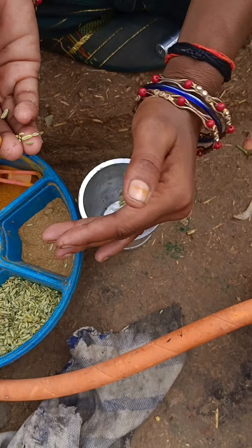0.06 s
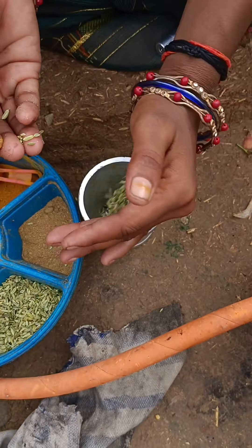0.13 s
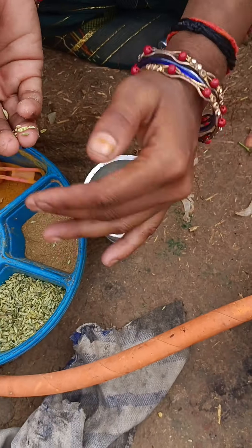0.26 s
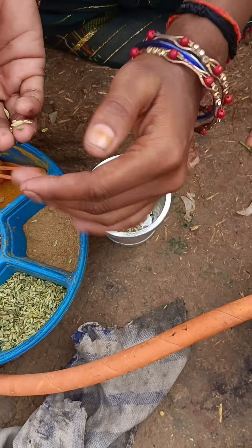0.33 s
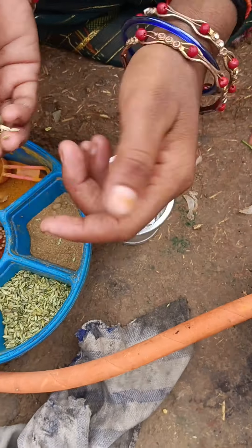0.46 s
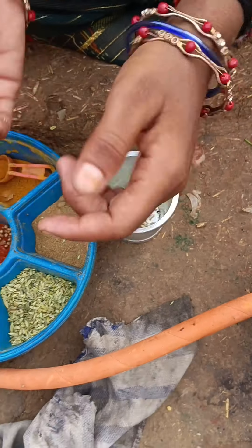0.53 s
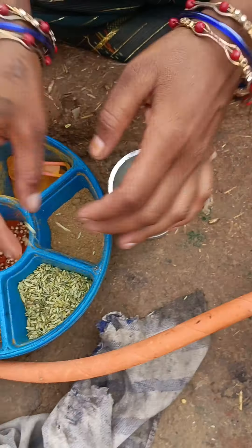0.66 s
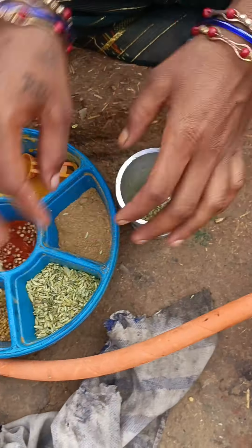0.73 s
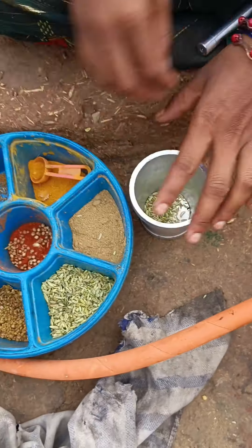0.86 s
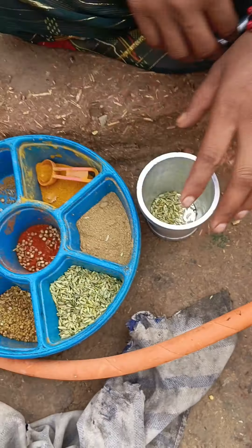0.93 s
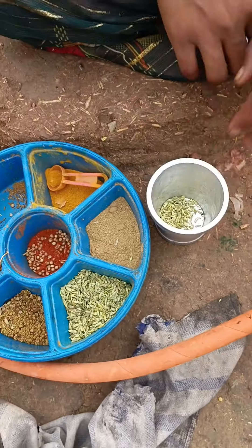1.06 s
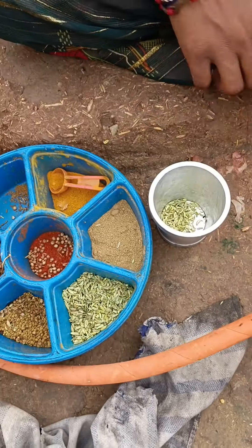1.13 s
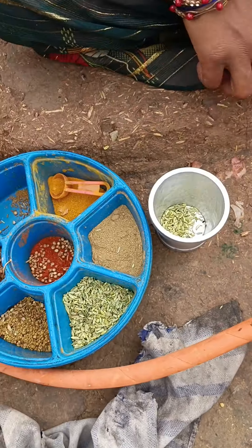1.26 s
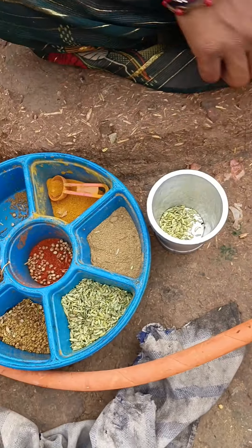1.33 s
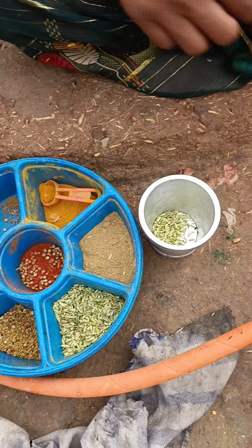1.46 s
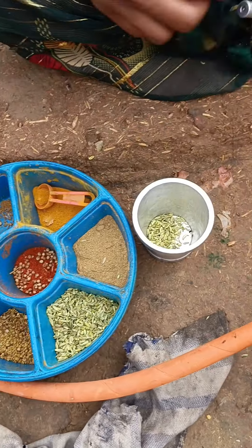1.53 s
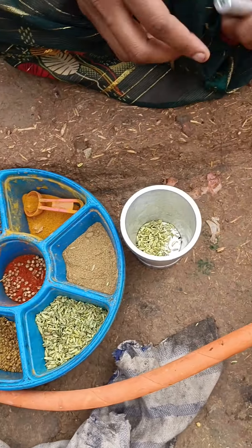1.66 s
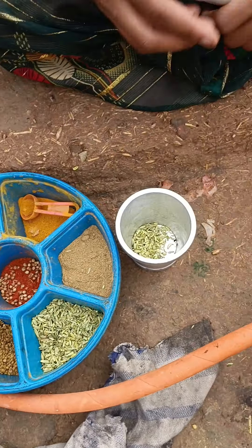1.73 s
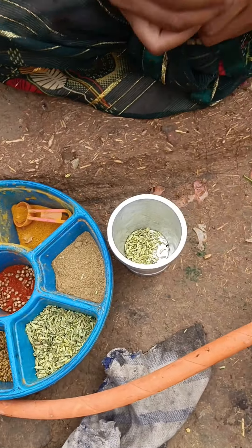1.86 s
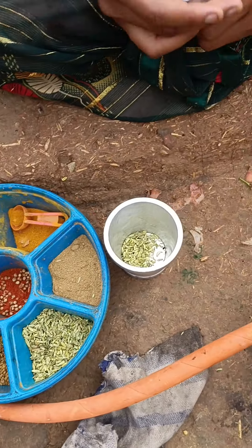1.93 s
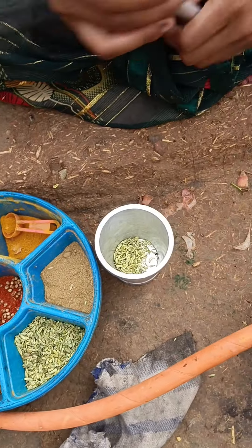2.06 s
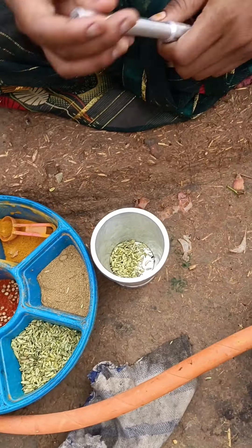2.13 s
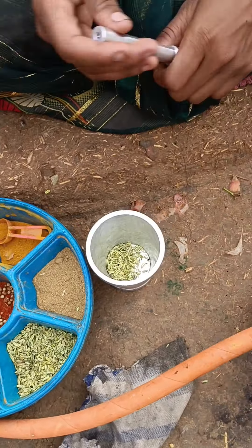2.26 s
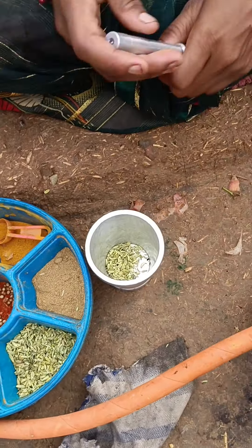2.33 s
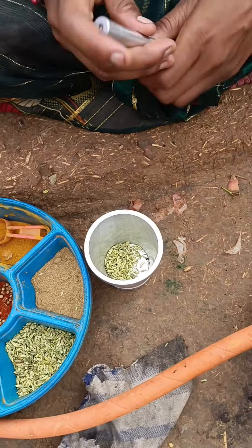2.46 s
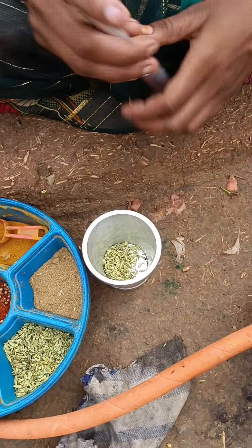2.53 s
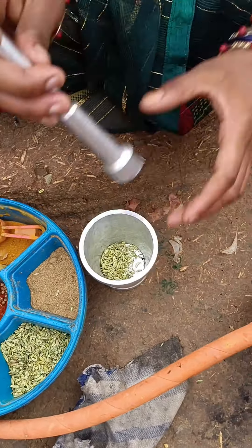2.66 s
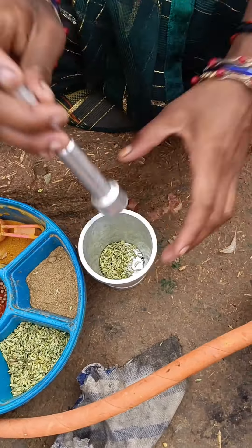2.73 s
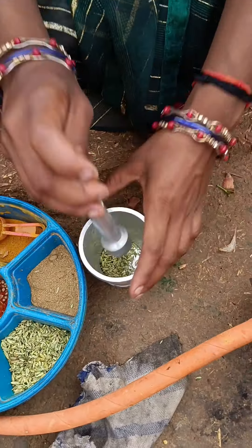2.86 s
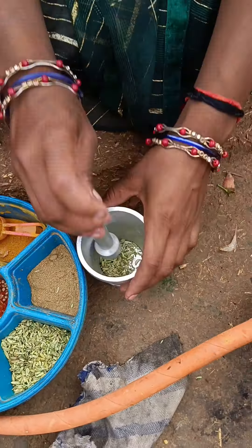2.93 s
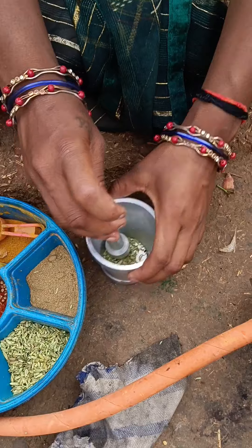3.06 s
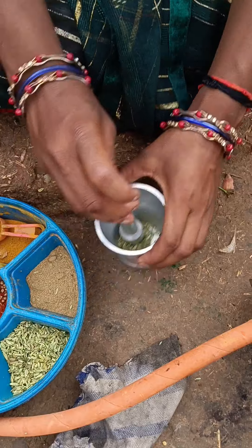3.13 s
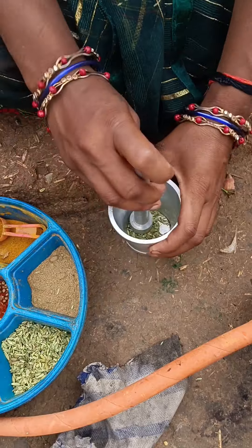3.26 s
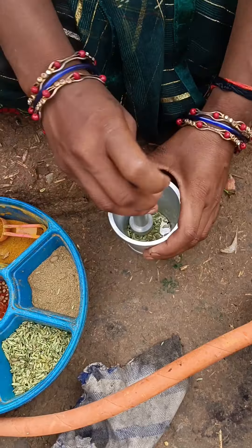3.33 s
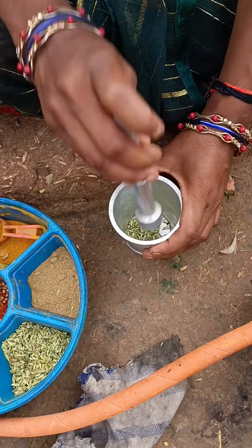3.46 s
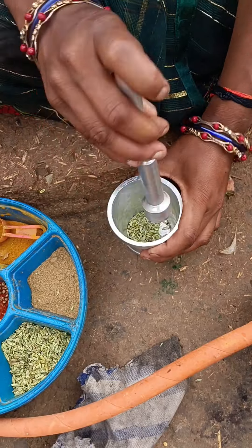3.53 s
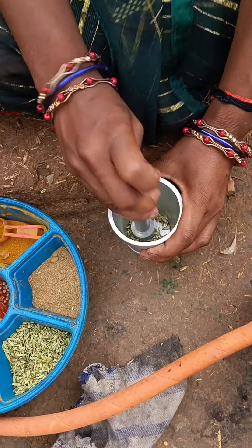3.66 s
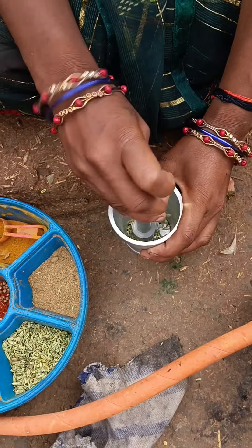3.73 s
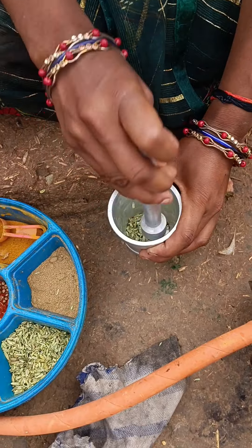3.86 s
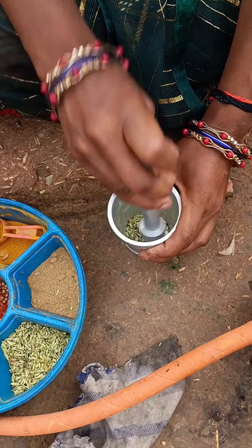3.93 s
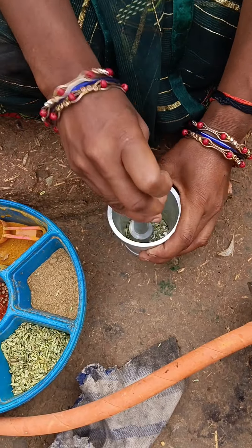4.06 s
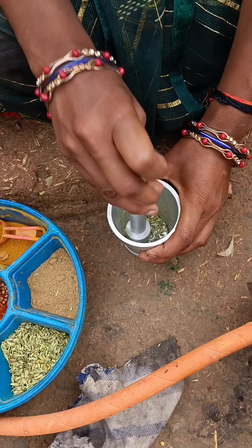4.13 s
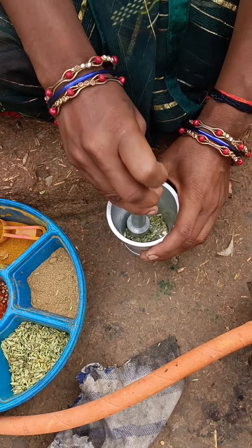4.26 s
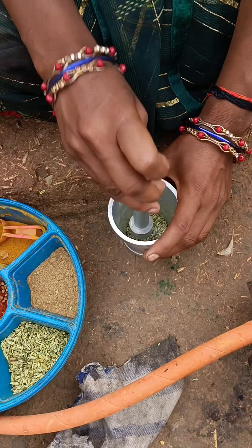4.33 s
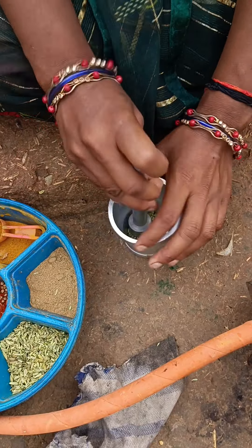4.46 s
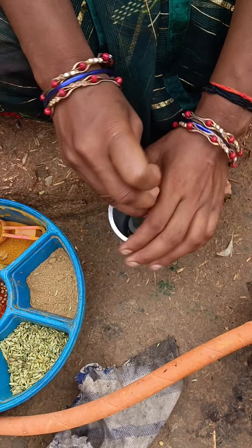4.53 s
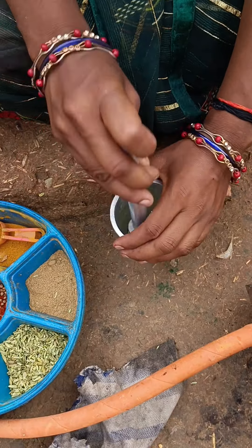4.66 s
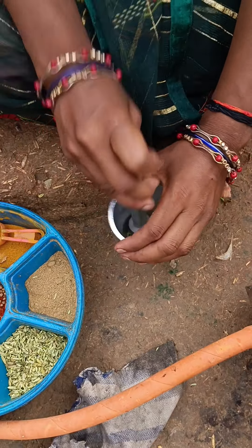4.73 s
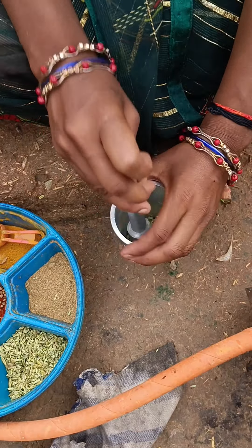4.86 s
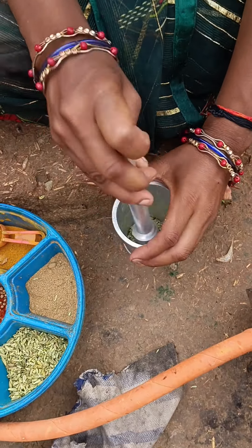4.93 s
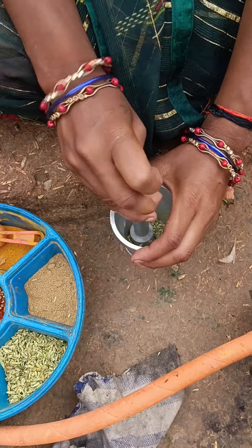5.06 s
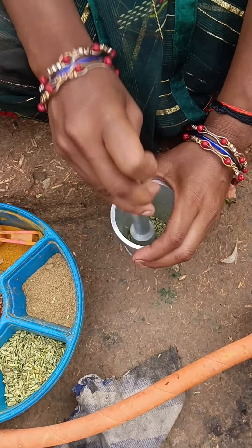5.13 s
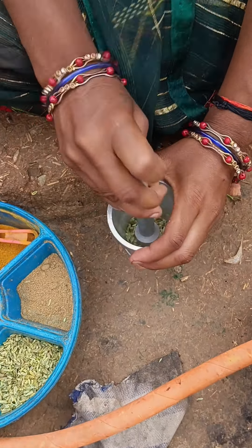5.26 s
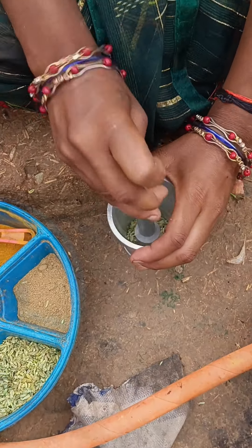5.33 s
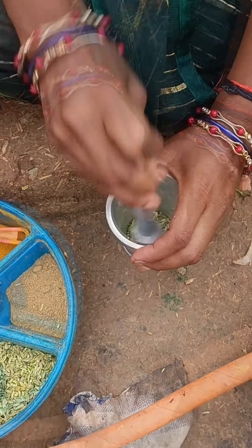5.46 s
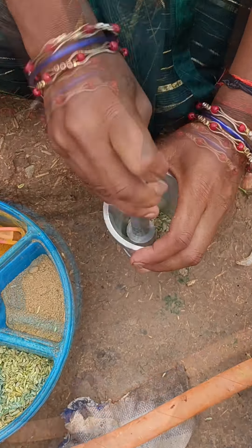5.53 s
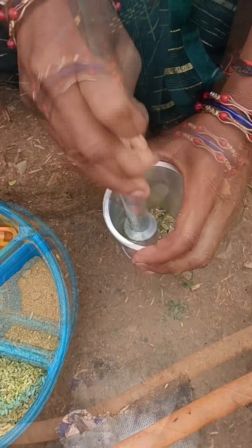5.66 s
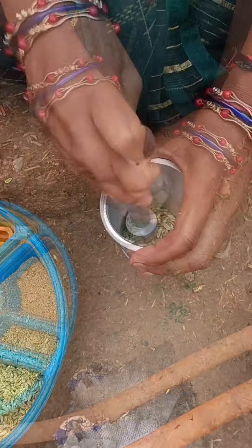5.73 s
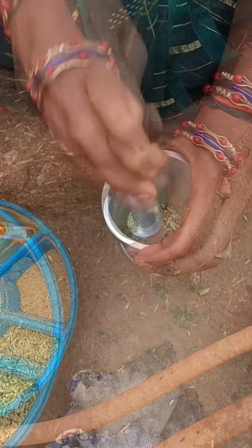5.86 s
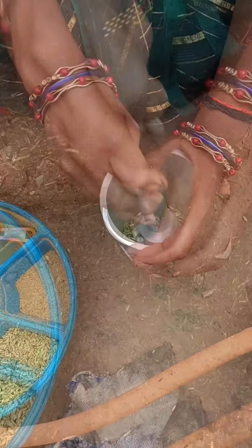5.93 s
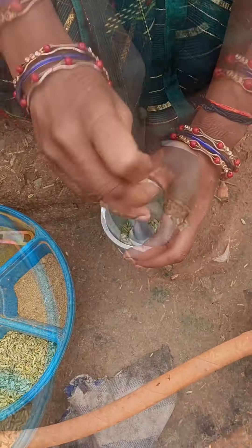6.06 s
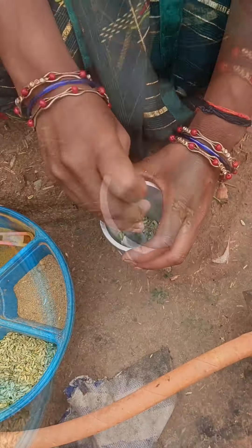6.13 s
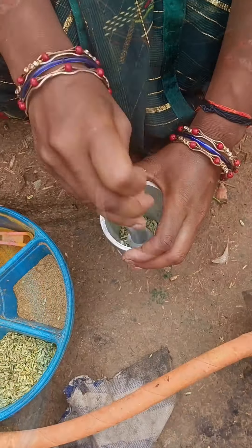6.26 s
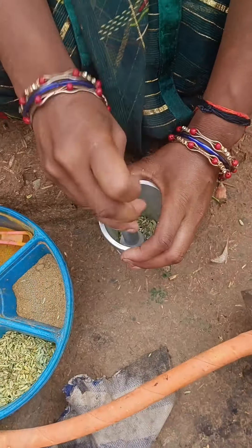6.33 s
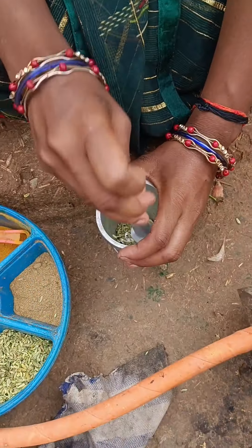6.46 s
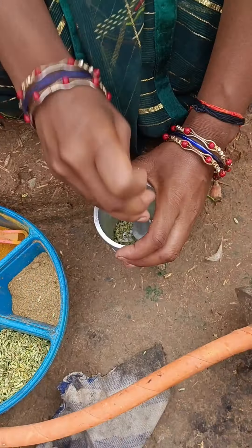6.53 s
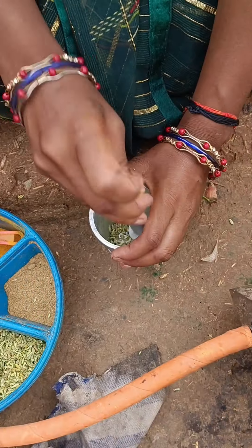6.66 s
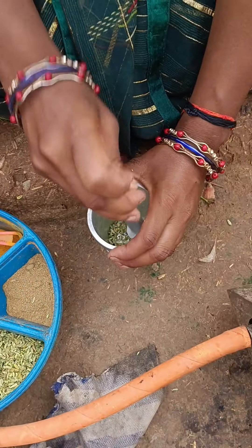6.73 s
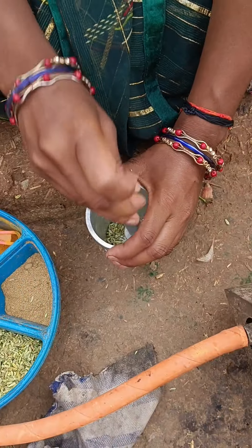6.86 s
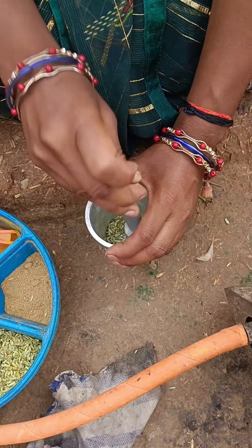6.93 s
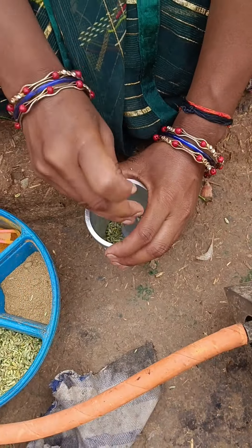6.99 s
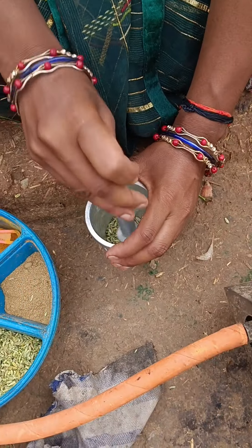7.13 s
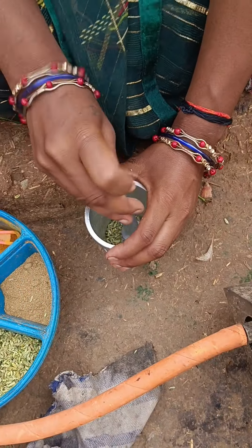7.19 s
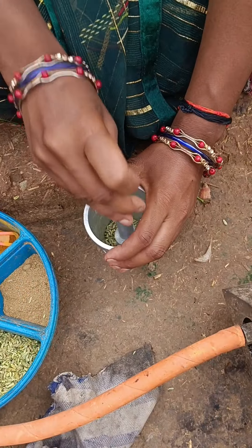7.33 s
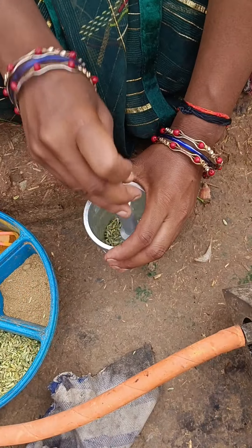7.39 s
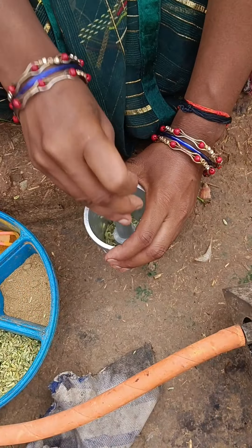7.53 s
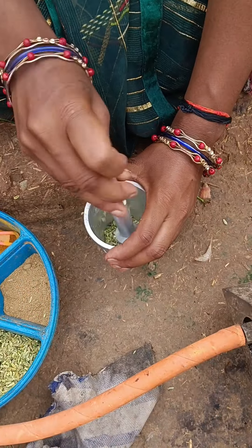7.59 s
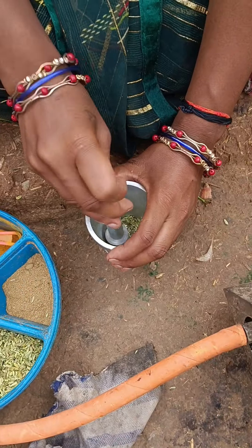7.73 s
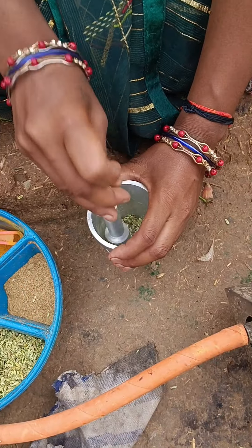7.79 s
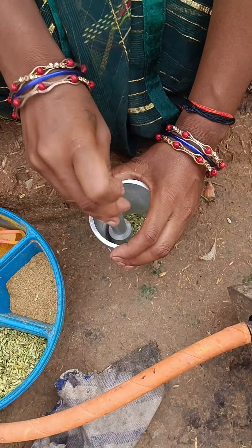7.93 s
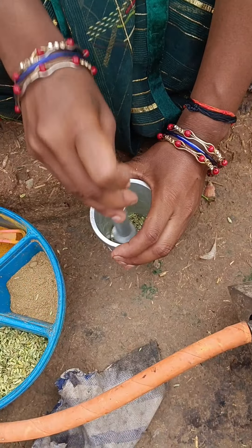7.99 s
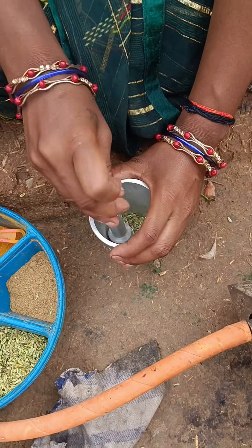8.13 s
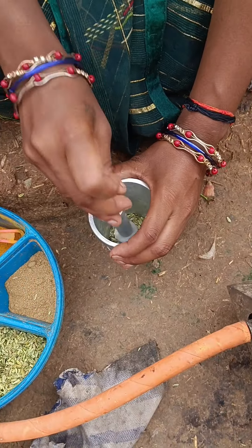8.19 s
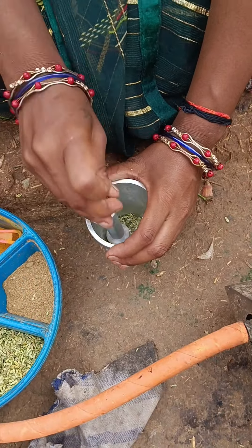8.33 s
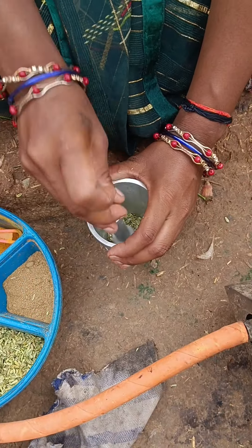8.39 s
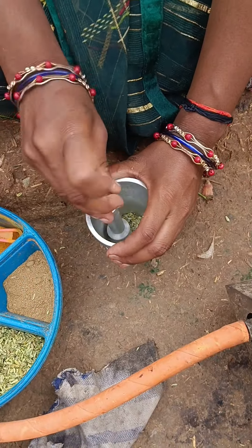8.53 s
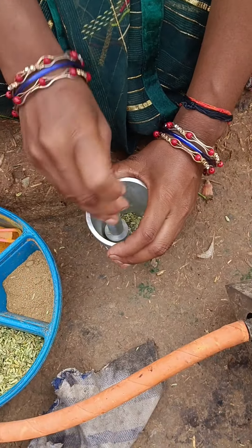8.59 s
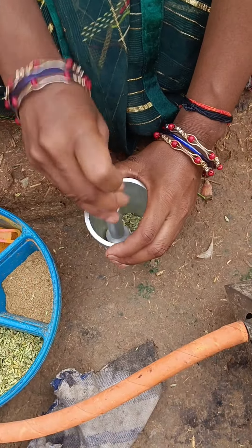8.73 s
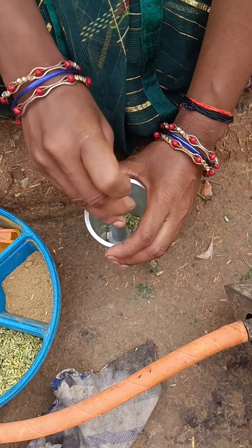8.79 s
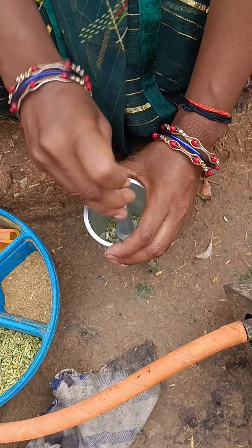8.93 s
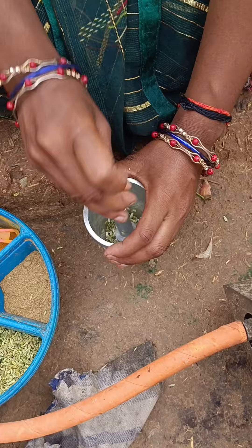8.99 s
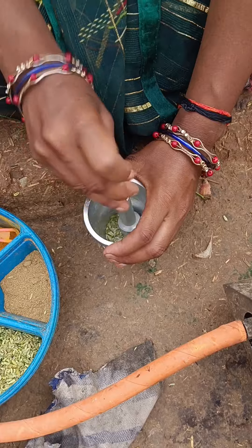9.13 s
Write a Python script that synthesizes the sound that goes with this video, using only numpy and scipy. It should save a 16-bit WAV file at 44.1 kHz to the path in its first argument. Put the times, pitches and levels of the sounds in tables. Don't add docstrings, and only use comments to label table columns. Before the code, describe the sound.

Quiet yard hiss, dry ticks and a faint cricket, then close metallic knocking, seed-crushing thuds and gritty wall scrapes as bangles chatter on the wrists.

```python
import sys
import numpy as np
from scipy import signal
from scipy.fft import rfft, irfft, next_fast_len
from scipy.io import wavfile
from scipy.ndimage import uniform_filter1d, map_coordinates

SR = 44100
rng = np.random.default_rng(int(sys.argv[2]) if len(sys.argv) > 2 else 0)


def materialize(psi):
    bounded = np.clip(np.atleast_2d(psi).T, -1, 1)
    quanta = np.round(bounded * 32767).astype(np.int16)
    wavfile.write(sys.argv[1], SR, quanta)


def to_linear_factor(level_db):
    exponent = np.asarray(level_db, float) / 20
    return 10 ** exponent


N = 404375

# time [s], yard hiss [dB], wind on the ports [dB], shifting seeds and cloth [dB].
BEDS = [(0.0, -59.5, -59, -57.5), (1.05, -59, -65, -56.5), (1.25, -60, -46, -61), (1.5, -60, -61, -56),
        (2.83, -56.5, -77, -75), (3.57, -60, -84, -72), (4.01, -57, -65.5, -59), (5.31, -61.5, -85, -55),
        (6.788, -56.5, -81, -73), (8.3, -57.5, -82, -81), (9.17, -58.5, -48, -71)]
# frequency [Hz], density [dB per Hz].
YARD = [(24, -25), (40, 0), (81, 0), (177, 0), (386, -12.5), (725, -7), (823, -12), (1170, -10),
        (1990, -17), (2900, -11.5), (4130, -21), (6330, -16.5), (7010, -17), (14500, -34.5), (16500, -29)]
# frequency [Hz], correlation [0 to 1].
ALIKE = [(60, 0.88), (130, 1), (290, 0.71), (640, 1), (1410, 0.87), (3100, 1), (6820, 0.32), (15000, 0.26)]
# frequency [Hz], lead [radians].
YARD_LEAD = [(60, 0.08), (400, 0.24), (750, 2.5), (1200, 0.86), (2200, 2.0254), (16000, 1)]
# frequency [Hz], density [dB per Hz].
SEEDS = [(1500, -49), (3000, -10.5), (6000, -10.5), (9000, -8.5), (14000, -20.5), (15500, -5), (16500, -39)]
# start [s], peak [dB].
TICKS = [(0.026, -36), (0.161, -37.5), (0.752, -34.5), (0.964, -35), (1.145, -34.5), (1.2866, -38),
         (1.331, -41), (1.5523, -36), (2.004, -40), (2.149, -38), (2.37, -33.5), (2.4473, -32.5),
         (3.218, -33), (3.2384, -35), (3.789, -31.5), (3.9732, -31), (4.045, -44), (7.2613, -29.5),
         (7.5164, -34), (7.5996, -25.5), (8.3598, -38), (8.972, -30), (8.991, -31), (5.073, -35.5)]
# start [s], peak [dB].
FAR = [(0.058, -32), (0.33, -34), (0.58, -31), (0.848, -33), (1.042, -32.5), (1.127, -33), (1.22, -26.5),
       (1.398, -34.5), (1.486, -32), (1.732, -28.5), (1.965, -29.5), (2.245, -28.5), (2.49, -26.5),
       (2.753, -29), (3.004, -29), (3.285, -37), (3.379, -31), (3.551, -34), (3.781, -35)]
# time [s], chirps so far [count].
CHIRPS = [(.425, 4), (1.5, 14), (2.032, 19), (2.787, 26), (3.671, 34), (9.17, 84)]
# start [s], peak [dB], ring over scuff [dB].
JINGLES = [(0.7134, -32, -1), (.742, -33.5, 1), (.79, -42, 11), (.824, -26.5, -0.5), (.862, -33, -11),
           (.915, -42, 1), (1.048, -30, -5), (1.062, -28.5, -4), (1.0747, -31, -1), (1.095, -33, -15),
           (1.534, -32, -10), (1.567, -33, -3), (1.651, -34.5, 1), (1.681, -33, -3), (3.024, -32, -4),
           (3.121, -21.5, -2), (3.892, -22, -3), (3.951, -31, 4.5), (3.979, -24.5, -3.5), (4.275, -33, 1),
           (4.328, -34, -5), (4.562, -41.5, 9), (4.809, -31, -1.5), (4.913, -24, -10), (5.266, -37, 1),
           (5.698, -30.5, 4), (5.796, -40, 5), (5.885, -39, 1), (6.1, -44, 0), (6.248, -35, 2),
           (6.355, -50, -4), (6.455, -36, 7), (6.522, -45, -8), (6.65, -34, 4), (6.67, -29, 2),
           (6.735, -28, -6), (6.85, -30, -5), (6.881, -27, 4), (7.298, -31, 4), (7.509, -33.5, 7),
           (7.797, -34, 0), (7.85, -29.5, 2), (8.176, -31, -2), (8.195, -31, -8), (8.66, -34, -1),
           (8.688, -33, 0), (8.731, -34, -3), (8.845, -44, -2), (8.89, -42, -8), (9.065, -35, 0)]
# frequency [Hz], width [Hz], level [dB].
GLASS = [(6130, 90, -8), (8520, 80, -1), (11220, 70, 0), (11550, 90, -7), (13100, 90, -5), (14120, 90, 0)]
# frequency [Hz], level [dB], free t60 [s].
METAL = [
    [(3122, 0, 5), (3040, -16, .05)],
    [(2200, -2, .045), (3890, 0, .045), (4170, -3, .04), (2500, -9, .03), (1150, -12, .04),
     (1500, -14, .03), (4950, -12, .04), (6440, 0, .07), (6140, -8, .04)],
    [(8310, 0, .09), (8720, -18, .04)],
    [(10820, -4, .4), (12880, 0, .4)],
]
GRIP_DAMPS = [0.96, 0.99, 1, 2.2]
# start [s], peak [dB], t60 [s], cup modes [dB].
LOOSE_KNOCKS = [(3.1312, -8.5, 3.4, -9.5), (4.11, -12.5, 0.019, -41), (4.343, -10.5, 0.059, -8),
                (4.4063, -6, 0.1, -10.5), (4.654, -12, 3.9, -1.5), (4.7691, -26, 0.019, 1.5),
                (4.9325, -15, 0.077, -0.3), (5.116, -13.5, 0.032, -10), (5.3241, -22.5, 0.025, -13.5),
                (5.376, -6, 0.014, -16.5), (5.5439, -25, 0.068, -7), (5.6294, -11, 0.021, -14.5),
                (5.916, -23, 0.055, -2)]
# start [s], peak [dB], t60 [s], cup modes [dB].
TIGHT_KNOCKS = [(6.1972, -13, 0.028, -13.5), (6.48, -41, 0.028, -12), (6.507, -22.5, 0.029, -1),
                (6.5898, -18.5, 0.12, -2.5), (6.691, -7.5, 0.032, -19.5), (6.942, -16.5, 0.016, -3),
                (7.0432, -13.5, 0.052, -4.5), (7.3336, -3, 0.02, -15.5), (7.7863, -3, 0.019, -17.5),
                (7.8238, -5, 0.022, -8.5), (7.999, -14, 0.03, -10), (8.0501, -6.5, 0.02, -11),
                (8.2263, -0.5, 0.013, -20), (8.2406, -30, 0.35, -9), (8.2745, -11, 0.029, -1.5),
                (8.4324, -2, 0.021, -12.5), (8.6017, -5, 0.021, -9.5), (8.8195, -25, 0.012, -9),
                (8.842, -21, 0.03, -12), (8.9151, -6, 0.01, -7)]
# start [s], peak [dB].
RATTLE = [
    (3.1374, -26),
    (3.1434, -23),
    (3.1504, -18),
    (3.1582, -17.5),
    (3.1674, -20),
    (3.1724, -20.5),
    (3.1794, -40),
]
# frequency [Hz], width [Hz], level [dB].
CUP = [(1090, 220, -4), (2220, 90, 2.5), (4190, 120, -0.5), (6360, 76, 0)]
# start [s], peak [dB], hollow note [dB], crunch [dB].
THUDS = [(3.832, -15, -4, 2.5), (4.152, -15.5, -13.5, 3.5), (4.405, -25.5, -6, 19.5),
         (4.654, -20.5, -25, 6), (4.931, -23, -5.5, 19), (5.183, -21.5, -2.5, -2), (5.435, -22.5, -34, 4),
         (5.618, -33, -8, -14), (5.673, -26.5, -9, 2), (5.845, -27.5, -19, 6), (6.064, -19, 1, -4),
         (6.289, -24.5, -9.5, 9), (6.508, -22.5, -9.5, -1), (6.721, -26.5, -28, 7), (6.94, -16, -0.5, 2.5),
         (7.144, -15, -3, -3), (7.37, -16, -0.5, -7), (7.602, -18.5, 3.5, -14), (7.824, -23, -3, 11),
         (8.055, -30, 3, 19.5), (8.271, -22.5, -10, 17), (8.491, -20, -6, -7), (8.707, -14.5, 7.5, -10),
         (8.915, -20.5, 1.5, 4), (9.11, -21, -5.5, 5)]
# frequency [Hz], width [Hz], level [dB].
GROUND_MODES = [(98, 26, -6.5), (207, 50.4, -4), (400, 226, -10), (516, 189, -7), (744, 195, -10),
                (950, 196, -12.5), (1420, 320, -15)]
# start [s], peak [dB], length [s].
RUBS = [(4.0914, -28, 0.03), (5.353, -27, 0.066), (5.5817, -22, 0.021), (5.736, -38, 0.062),
        (5.769, -34.5, 0.024), (6.354, -44, 0.025), (6.426, -37, 0.011), (7.104, -31, .02),
        (5.813, -25.5, 0.029), (5.957, -32, 0.047), (5.998, -22, 0.022), (6.027, -23.5, 0.018),
        (6.2163, -25, 0.029), (6.257, -22, 0.02), (6.376, -25.5, 0.03), (6.414, -31.5, 0.054),
        (6.472, -19, 0.019), (6.578, -29, 0.02), (6.594, -19, 0.014), (6.606, -18.5, 0.018),
        (6.7937, -25.5, 0.039), (6.826, -20, 0.061), (6.861, -27, 0.028), (6.892, -19.5, 0.035),
        (7.036, -23.5, 0.059), (8.451, -24, 0.021), (8.615, -21, 0.017), (8.629, -18, 0.02),
        (8.644, -20, 0.014), (8.665, -20, 0.0056), (8.846, -28, 0.018), (8.874, -19.5, 0.018),
        (8.994, -26, 0.035), (9.017, -16.5, 0.011), (9.035, -14.5, 0.02), (9.074, -21, 0.0091)]
# start [s], peak [dB].
CATCHES = [(5.7334, -35), (5.7745, -17.5), (5.8192, -21), (5.9633, -28), (5.975, -30), (6.003, -31),
           (6.0359, -15), (6.2248, -11), (6.262, -11.5), (6.348, -37), (6.3714, -25), (6.3797, -16),
           (6.391, -18), (6.4143, -10), (6.4383, -13.5), (6.4782, -34), (6.576, -20), (6.7995, -16),
           (6.833, -25), (6.8504, -29), (6.8797, -20), (6.9062, -33), (7.1103, -26), (8.4577, -21),
           (8.6178, -11), (8.634, -6), (8.6716, -14), (8.8505, -10), (8.8797, -20), (9.001, -10),
           (9.0207, -8), (9.043, -22), (9.0864, -12)]
# frequency [Hz], width [Hz], level [dB].
WALL_LOW = [(1016, 125, -11.5), (1390, 320, -9.5), (2210, 74, -3), (3069, 88, 11.5), (4040, 446, -7),
            (5130, 1400, -20)]
# frequency [Hz], width [Hz], level [dB].
WALL_HIGH = [(6400, 300, -2), (8280, 220, 0), (10800, 250, -16), (12900, 250, -16)]
# frequency [Hz], lead [radians].
NEAR_LEAD = [(100, -0.014), (300, 0.36), (900, 2.2), (1100, 0.74), (2200, -1.36), (3120, -1.35),
             (4000, -1.24), (16000, -1.86)]
# frequency [Hz], difference [dB].
NEAR_TILT = [(100, 2.5), (220, -2.5), (560, 1.5), (950, 11.5), (1100, -2), (1400, -5.5), (3120, 5.5),
             (4000, -3.5), (6400, 6.5), (9000, 0), (15000, -6)]
# frequency [Hz], t60 [s].
SCATTER_T60 = [(300, 0.098), (1000, 0.11), (4000, 0.078), (12000, 0.056)]

POUNDING_START_S = THUDS[0][0]
TOUCH_S, SHAKE_DB, CHATTER_RING_DB, SLIDE_SHAKES_DB = 0.015, -56, 5, -18
JOLT_LAG_S, JOLT_DB, JOLT_S, JOLT_RING_DB = 0.012, -15.5, 0.022, 4
BAR_LOOSE_DB, BAR_TIGHT_DB, BAR_FOLLOWS_CUP = -2.5, -13.5, -0.0069
RIM_LOOSE_DB, RIM_TIGHT_DB, RIM_FOLLOWS_CUP = -28, -19, 0.88
UNHELD_RIM_DB = 14.5
USUAL_CUP_DB = -11
CHOKE_T60_S, CHOKE_LASTS_S, HELD_T60_S = 0.07, 0.016, 0.2
CLOSING_S = 0.25
HOLLOW_HZ, HOLLOW_RISE_S, HOLLOW_T60_S = 1092, 0.003, 0.04
RUB_UPPER_DB = -11.5


def unit(x):
    return x / np.sqrt(np.mean(x ** 2) + 1e-20)


def along(points, hz):
    f, v = np.transpose(points)
    return np.interp(np.log(hz + 1), np.log(f + 1), v)


def filtered(x, response):
    m = next_fast_len(N + SR // 2)
    return irfft(rfft(x, m) * response(np.fft.rfftfreq(m, 1 / SR)), m)[..., :N]


def resonances(peaks):
    def response(f):
        total = 0
        for k, (centre, width, db) in enumerate(peaks):
            damping = 1j * f * width
            total = total + (-1) ** k * to_linear_factor(db) * damping / (centre * centre - f * f + damping)
        return total
    return response


def wobble(rate_hz):
    knots = rng.standard_normal(int(N * rate_hz / SR) + 4)
    return map_coordinates(knots, [np.arange(N) * rate_hz / SR])


def add(track, s, sound):
    part = track[..., round(s * SR):][..., :sound.shape[-1]]
    part += sound[..., :part.shape[-1]]


def grit(density_hz, spread_db):
    hits = rng.random(N) < density_hz / SR
    return unit(hits * rng.standard_normal(N) * to_linear_factor(spread_db * rng.standard_normal(N)))


def swell(rows, rise):
    env = np.zeros(N)
    for s, db, length in rows:
        samples = max(length, 0.004) * SR
        u = np.arange(round(3 * samples)) / samples
        add(env, s, to_linear_factor(db) * np.minimum(u / rise, 1) * np.exp(-u ** 2 * 2.27))
    return env


def strikes(rows):
    out = np.zeros(N)
    for s, db in rows:
        add(out, s, to_linear_factor(db) * np.hanning(5))
    return out


def ports(x, lead, tilt):
    def half(hz):
        return np.exp(0.5j * along(lead, hz)) * to_linear_factor(along(tilt, hz) / 2)
    return filtered(x, lambda hz: np.array([half(hz), 1 / half(hz)]))


def rush(spectrum, alike, patchy_db):
    z = signal.stft(rng.standard_normal((2, N)), nperseg=512)[2]
    field = uniform_filter1d(rng.standard_normal(z.shape[1:]), 6, 0)
    field = uniform_filter1d(field, 10, 1)
    pair = signal.istft(z * to_linear_factor(patchy_db * unit(field)), nperseg=512)[1][:, :N]

    def shares(hz):
        turn = np.arccos(np.clip(along(alike, hz), -1, 1)) / 2
        return to_linear_factor(along(spectrum, hz)) * [np.cos(turn), np.sin(turn)]
    middle, side = filtered(pair, shares)
    return unit(ports(middle, YARD_LEAD, [(100, 0.013)]) + np.array([side, -side]))


def yard():
    s, *columns = np.transpose(BEDS)
    yard_db, wind_db, rustle_db = [np.interp(np.arange(N) / SR, s, c) for c in columns]
    hiss = to_linear_factor(yard_db + 12 + 1.2 * wobble(9.0)) * rush(YARD, ALIKE, patchy_db=1.02)
    wind_spectrum = [(15, -20), (35, 0), (65, -2), (110, -40), (200, -120)]
    wind = to_linear_factor(wind_db + 9 + 2.5 * wobble(4) + [[2.5], [-2.5]])
    wind = wind * rush(wind_spectrum, [(40, 0.5)], patchy_db=1.5)
    rustle = to_linear_factor(rustle_db - 2 + 2 * wobble(30)) * rush(SEEDS, [(5000, 0.3)], patchy_db=2)
    return hiss + wind + rustle


def ticks():
    out, t = np.zeros(N), np.arange(SR // 50) / SR
    for s, db in TICKS:
        add(out, s, to_linear_factor(db + 2.0 - 60 * t / 0.0094) * rng.standard_normal(len(t)))
    return filtered(out, resonances([(1290, 4000, 6.5), (4770, 10600, 3.2)]))


def far_pounding():
    out, t = np.zeros(N), np.arange(SR // 5) / SR
    for s, db in FAR:
        tone = 0
        for hz, level_db in [(85, -1.5), (180, -5.5), (260, -10.5)]:
            gain = to_linear_factor(rng.normal(level_db, 3.55))
            tone = tone + gain * np.sin(2 * np.pi * hz * rng.normal(1, 0.066) * t)
        add(out, s, to_linear_factor(db - 1.0 - 60 * t / 0.13) * (1 - np.exp(-t / 0.0087)) * tone)
    return out


def cricket():
    s, count = np.transpose(CHIRPS)
    turn = np.interp(np.arange(N) / SR, np.r_[0, s], np.r_[0, count])
    u = (turn + 0.5) % 1 - 0.5
    phase = 2 * np.pi * np.cumsum(6430 - 900 * u + 100 * wobble(330)) / SR
    flutter = to_linear_factor(1.5 * wobble(4) + 2.5 * wobble(250))
    return to_linear_factor(-50) * flutter * np.exp(-(u / 0.055) ** 2) * np.sin(phase)


def bangles():
    out, t = np.zeros(N), np.arange(SR // 8) / SR
    hz, width, level = np.transpose(GLASS)[:, :, None]
    touches = [(s, db, TOUCH_S, ring_db) for s, db, ring_db in JINGLES]
    touches += [(s + JOLT_LAG_S, db + JOLT_DB, JOLT_S, JOLT_RING_DB) for s, db, *_ in THUDS]
    for s, db, length, ring_db in touches:
        mode_db = level + rng.normal(0, 4, hz.shape) - 40 * width * t
        body = (to_linear_factor(mode_db) * np.sin(2 * np.pi * hz * t)).sum(0)
        taps = (rng.random(len(t)) < 900 / SR) * rng.standard_normal(len(t))
        taps = taps * np.exp(-(t / max(length, 0.003)) ** 2)
        sound = signal.fftconvolve(taps, body)
        add(out, s, to_linear_factor(db + ring_db + 3) * sound / (np.abs(sound).max() + 1e-9))
    shaking = (np.arange(N) > POUNDING_START_S * SR) * to_linear_factor(SHAKE_DB + 4 * wobble(28))
    shaking = shaking + to_linear_factor(SLIDE_SHAKES_DB) * swell(RUBS, 0.5)
    rough = grit(7000, spread_db=3)
    scuff = rough * (swell([r[:3] for r in touches], 0.085) + shaking)
    chatter = filtered(rough * shaking * to_linear_factor(5.4 * wobble(30)), resonances(GLASS))
    return out + to_linear_factor(CHATTER_RING_DB) * chatter + filtered(scuff, lambda hz: to_linear_factor(along(SEEDS, hz)))


def clinks():
    out, t = np.zeros(N), np.arange(SR // 3) / SR
    hz, level, free_t60 = np.transpose(sum(METAL, []))[:, :, None]
    group = np.repeat(np.arange(len(METAL)), [len(g) for g in METAL])[:, None]
    is_cup = group == 1
    grip = np.array(GRIP_DAMPS)[group]
    knocks = [(*r, BAR_LOOSE_DB, RIM_LOOSE_DB) for r in LOOSE_KNOCKS]
    knocks += [(*r, BAR_TIGHT_DB, RIM_TIGHT_DB) for r in TIGHT_KNOCKS]
    contacts = np.sort([r[0] for r in knocks + RUBS + RATTLE[2:3]] + [N / SR])
    burst = []
    for s, db, t60, cup_db, bar_db, rim_db in knocks:
        spot_db = cup_db - USUAL_CUP_DB
        bar_db = bar_db + BAR_FOLLOWS_CUP * spot_db
        rim_db = rim_db + RIM_FOLLOWS_CUP * spot_db + UNHELD_RIM_DB * (s < POUNDING_START_S)
        gain = level + np.array([0, cup_db, bar_db, rim_db])[group]
        gain = gain + rng.normal(0, 2, hz.shape) * is_cup
        pitch = hz * (1 + rng.normal(0, 0.027, hz.shape) * is_cup)
        late = t - (contacts[np.searchsorted(contacts, s + 0.006)] - s)
        fall = t / free_t60 + (t / CLOSING_S) ** 2 + grip * t / np.clip(t60, 0.015, 3)
        fall = fall + np.clip(late, 0, CHOKE_LASTS_S) / CHOKE_T60_S + np.maximum(late, 0) / HELD_T60_S
        ring = (to_linear_factor(gain - 60 * fall) * np.sin(2 * np.pi * pitch * t)).sum(0)
        add(out, s, to_linear_factor(db + 1) * ring * (1 - np.exp(-t / 0.00044)))
        burst += [(s, db + cup_db + 12.0, 0.004), (s, db + cup_db - 20.5, 0.012)]
    impact = rng.standard_normal(N) * swell(burst, 0.0071)
    return out + filtered(impact, resonances([(2340, 3000, -5), (5250, 2200, -8.0)]))


def rattle():
    return to_linear_factor(25.5) * filtered(strikes(RATTLE), resonances(CUP))


def thuds():
    s, db, hollow_db, crunch_db = np.transpose(THUDS)
    t = np.arange(SR // 8) / SR

    def blows(level_db, length):
        return [(a, b, length) for a, b in zip(s, level_db)]

    def pulse(at, wide):
        return np.exp(-((t - at) / wide) ** 2)

    push = filtered(rng.standard_normal(N), lambda hz: 1 / (1 + 1j * hz / 1500) ** 2)
    force, hollow = np.zeros(N), np.zeros(N)
    variation = rng.standard_normal((len(s), 2))
    for a, b, h, (pitch, lag) in zip(s, db, db + hollow_db, variation):
        press = pulse(0.0016, 0.00019) + 0.62 * pulse(0.00456 + 0.00082 * lag, 0.00036)
        press = press + 0.15 * pulse(0.0034, 0.0042)
        add(force, a, to_linear_factor(b + 20.5) * press)
        note = np.sin(2 * np.pi * HOLLOW_HZ * (1 + 0.008 * pitch) * t)
        note = note * (1 - np.exp(-(t / HOLLOW_RISE_S) ** 2))
        add(hollow, a + 0.0013, to_linear_factor(h + 5 - 60 * t / HOLLOW_T60_S) * note)
    push = push * swell(blows(db + 7, 0.015) + blows(db + 6.5, 0.076), 0.16)
    ground = filtered(force + push, resonances(GROUND_MODES))
    crush = swell(blows(db + crunch_db - 19.0, 0.084) + blows(db + crunch_db, 0.0049), 0.22)
    crunch = filtered(grit(6000, spread_db=3) * crush, lambda hz: to_linear_factor(along(SEEDS, hz)))
    return ground + hollow + crunch


def rubs():
    rows = np.array(RUBS)
    rough = grit(6000, spread_db=3) * to_linear_factor(2 * wobble(150))
    catch = strikes(CATCHES)
    strong = resonances(WALL_LOW)
    dense = resonances([(2600, 3500, -13.5)])
    low_drive = rough * swell(rows, 0.42) + to_linear_factor(2.0) * catch
    high_drive = rough * swell(rows + [0, RUB_UPPER_DB, 0], 1.0) + to_linear_factor(-27) * catch
    low = filtered(low_drive, lambda hz: strong(hz) + dense(hz))
    high = filtered(high_drive, resonances(WALL_HIGH))
    return to_linear_factor(12) * low + to_linear_factor(18.5) * high


def scatter(x):
    hz, t, z = signal.stft(rng.standard_normal((4, SR // 5)), SR, nperseg=128)
    decay = to_linear_factor(-60 * t / along(SCATTER_T60, hz)[:, None])
    tail = signal.istft(z * decay, SR, nperseg=128)[1]
    upper = filtered(x, lambda f: (1j * f / (380 + 1j * f)) ** 3)
    wet = signal.fftconvolve(upper[None], tail / np.linalg.norm(tail[0]), axes=1)[:, :N]
    turn = 2 * wobble(5)
    return np.cos(turn) * wet[:2] + np.sin(turn) * wet[2:]


def scene():
    far = yard() + far_pounding() + cricket() * to_linear_factor([[1.5], [-1.5]])
    near = ticks() + bangles() + clinks() + rattle() + thuds() + rubs()
    return far + ports(near, NEAR_LEAD, NEAR_TILT) + to_linear_factor(-7.0) * scatter(near)


def top_cut(x):
    return signal.sosfilt(signal.butter(12, 16650, fs=SR, output="sos"), x)


def record(dry):
    mic = filtered(dry, lambda hz: (1j * hz / (55 + 1j * hz)) ** 2 / (1 + (hz / 15700) ** 30))
    mic = mic / (1 + np.abs(mic / 0.95) ** 6) ** (1 / 6)
    return top_cut(mic)


dry = scene()
out = record(dry)
materialize(out)
```